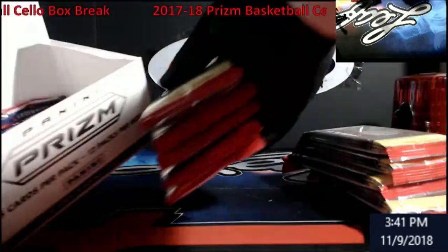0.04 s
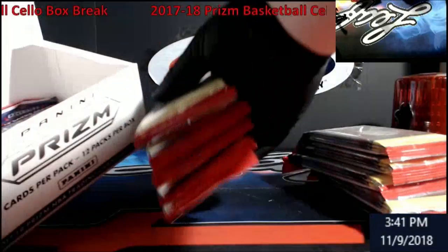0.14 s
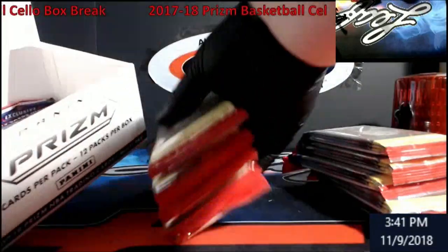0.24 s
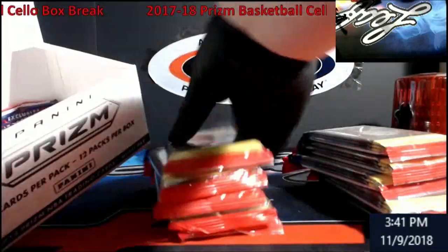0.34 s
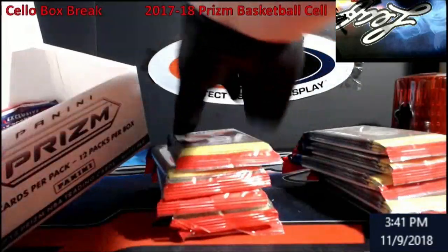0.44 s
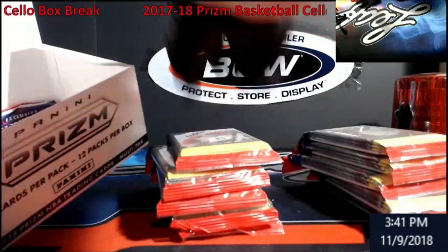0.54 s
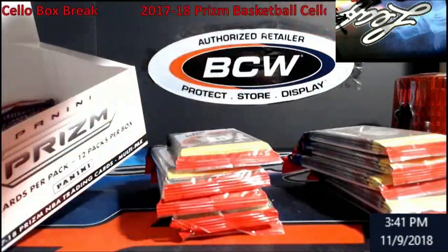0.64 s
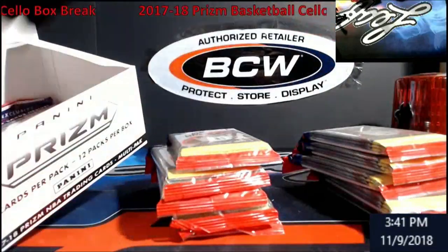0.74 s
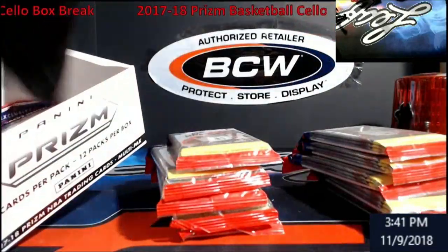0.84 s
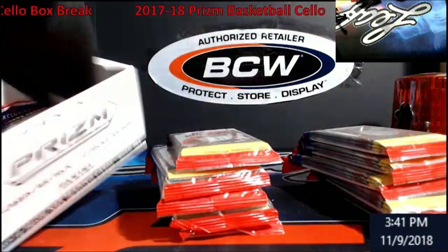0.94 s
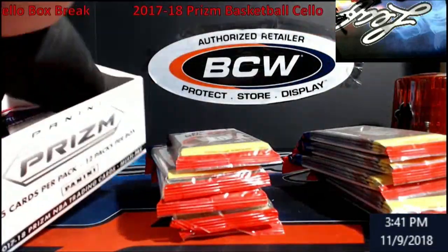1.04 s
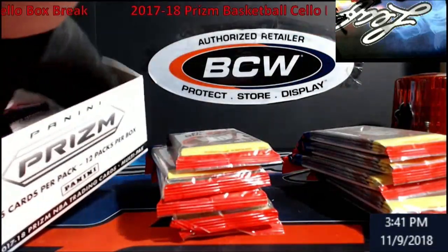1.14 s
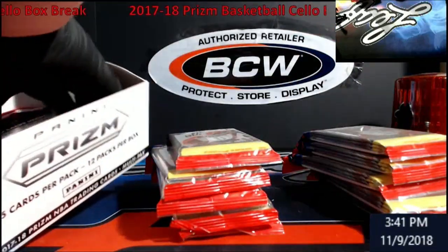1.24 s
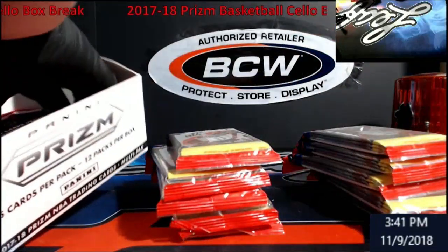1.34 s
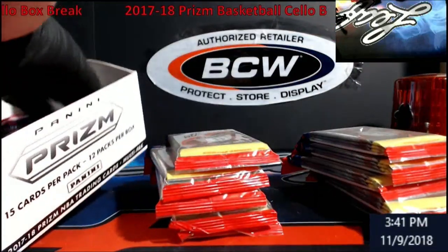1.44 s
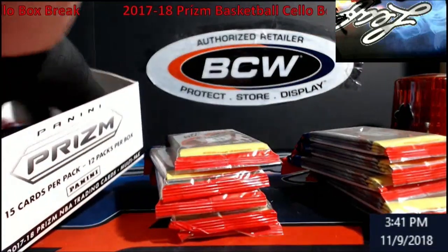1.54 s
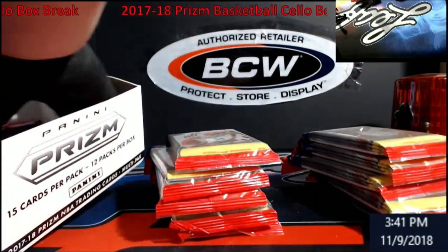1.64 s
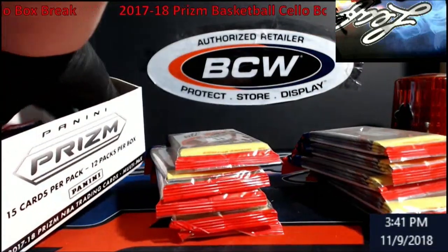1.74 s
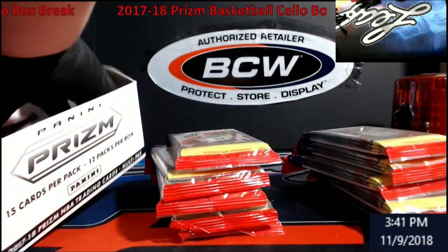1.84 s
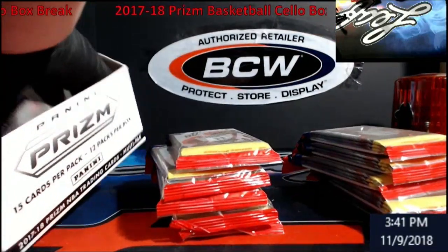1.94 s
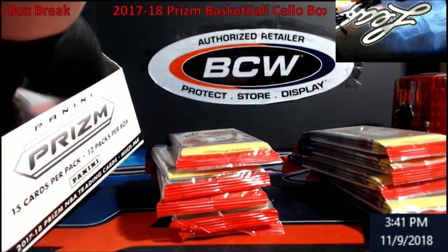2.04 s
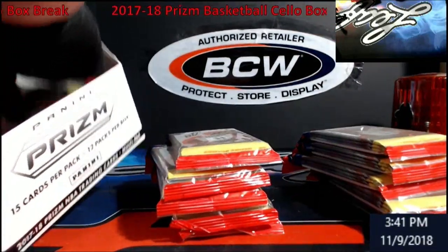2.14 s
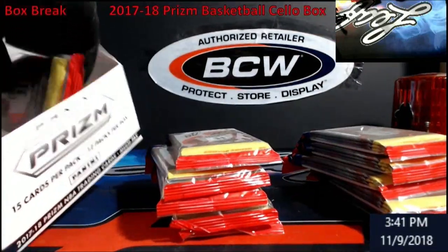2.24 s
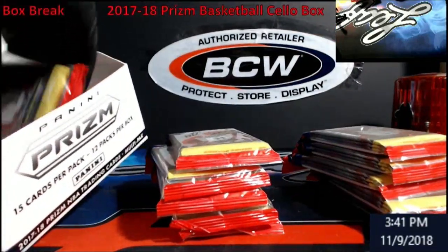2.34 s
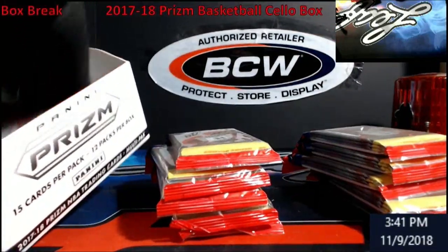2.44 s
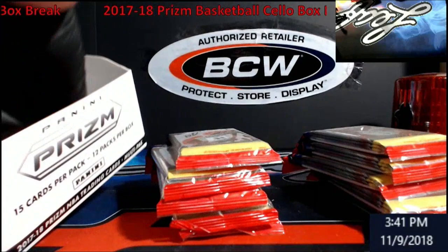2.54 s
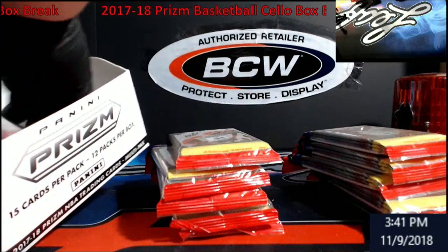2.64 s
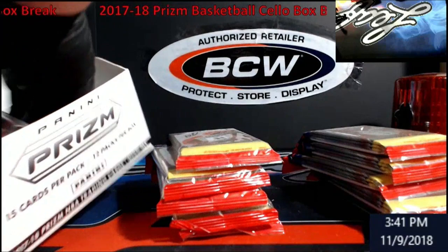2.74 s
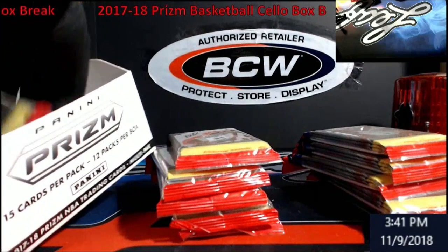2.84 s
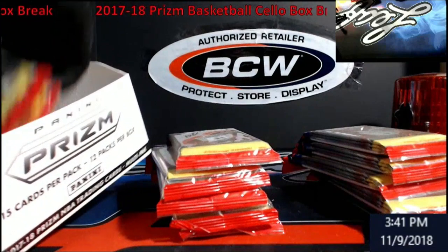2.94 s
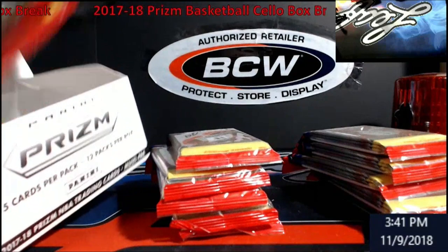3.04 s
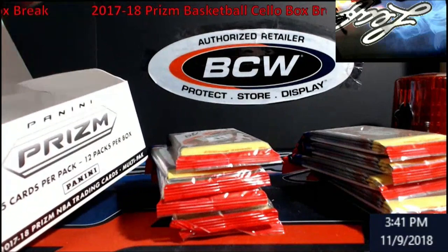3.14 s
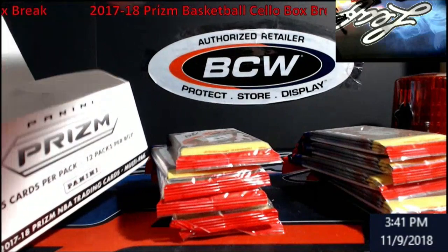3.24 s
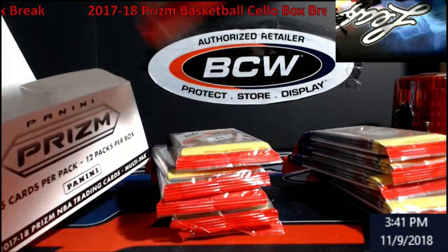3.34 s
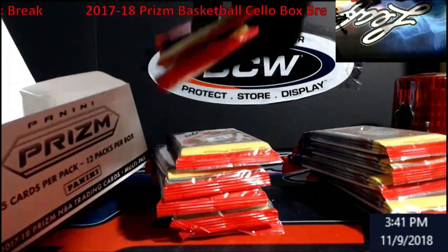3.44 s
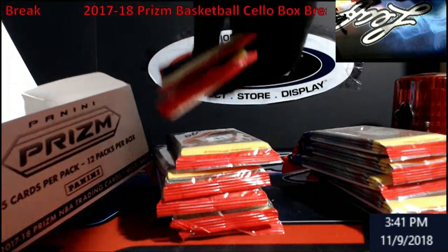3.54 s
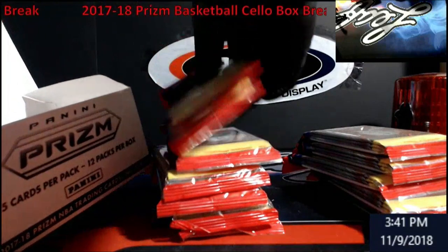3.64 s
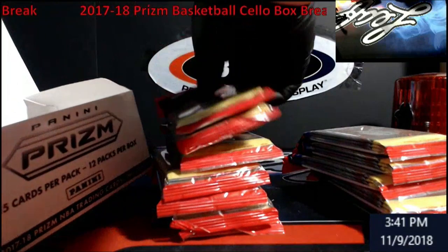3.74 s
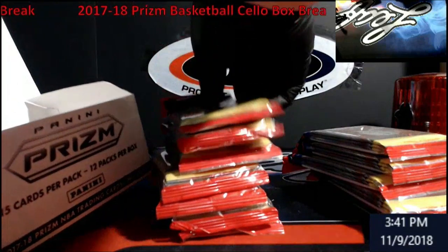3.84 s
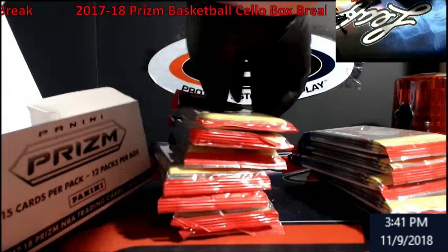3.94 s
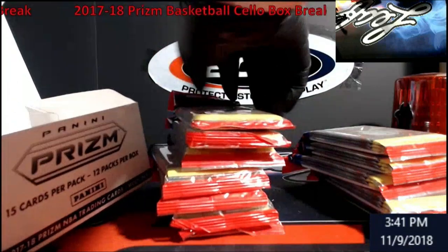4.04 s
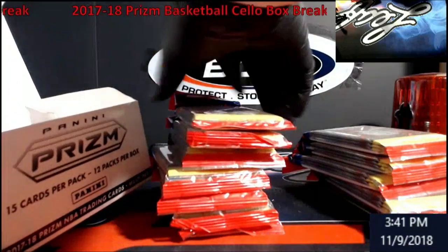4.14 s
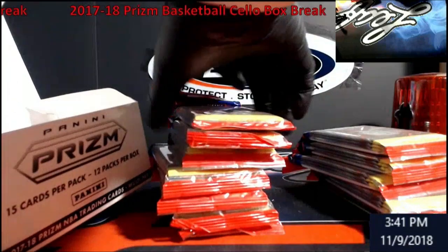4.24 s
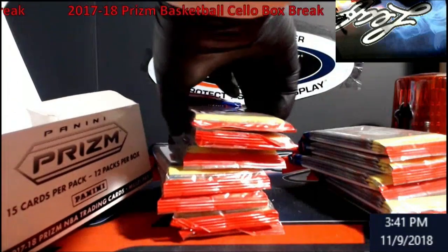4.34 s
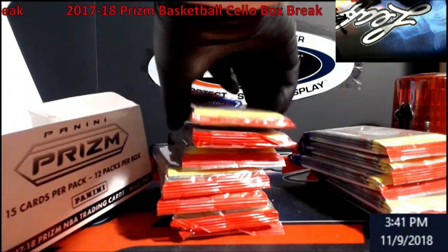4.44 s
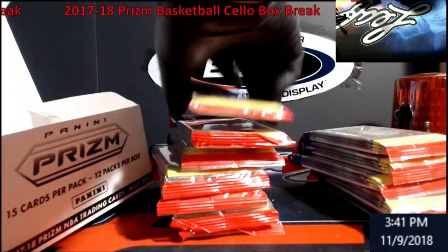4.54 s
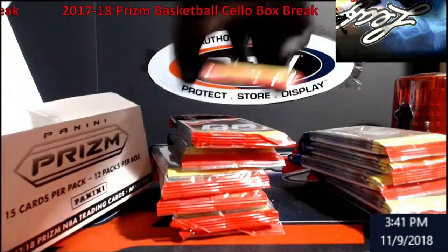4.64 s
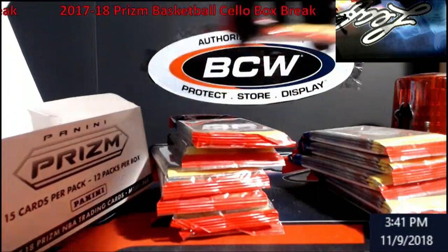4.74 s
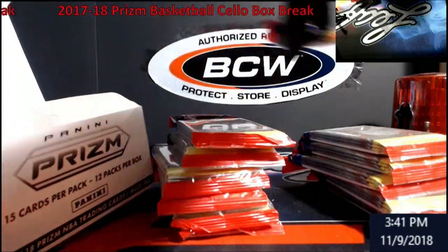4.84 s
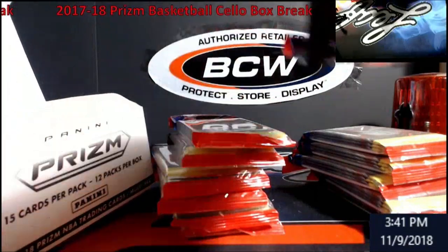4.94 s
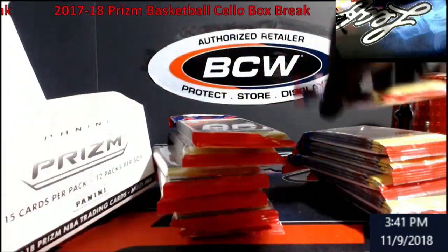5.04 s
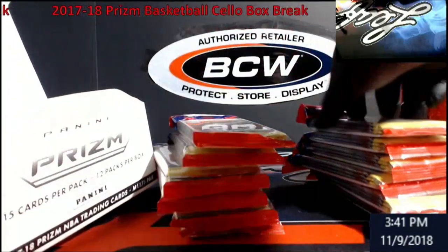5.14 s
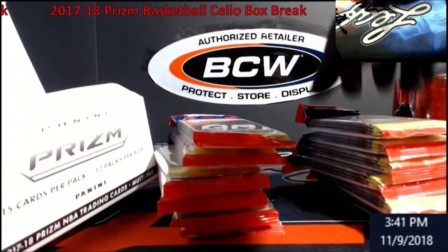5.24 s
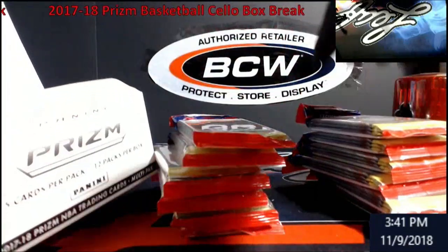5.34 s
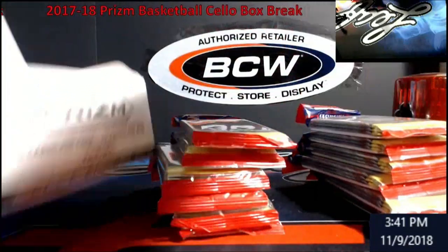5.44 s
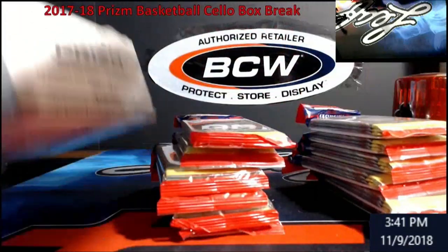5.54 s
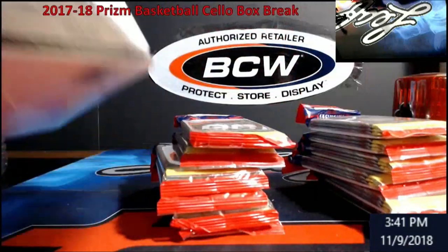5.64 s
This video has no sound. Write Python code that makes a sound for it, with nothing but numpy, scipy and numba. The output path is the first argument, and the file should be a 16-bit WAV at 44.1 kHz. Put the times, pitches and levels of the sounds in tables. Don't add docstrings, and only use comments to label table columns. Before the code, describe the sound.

Crinkly foil card packs crackle and snap as they are set down, dug noisily from a hollow cardboard box, then stacked softly.

```python
import sys
import numpy as np
from scipy import signal
from scipy.fft import rfft, irfft
from scipy.io import wavfile
from scipy.ndimage import uniform_filter1d, minimum_filter1d
from numba import njit

SR = 44100
rng = np.random.default_rng(int(sys.argv[2]) if len(sys.argv) > 2 else 0)


def inscribe(sig):
    pcm = np.round(np.clip(np.atleast_2d(sig).T, -1, 1) * 32767)
    wavfile.write(sys.argv[1], SR, pcm.astype(np.int16))


def volts_from_db(level):
    exponent = np.asarray(level, float) / 20
    return 10 ** exponent


N = 250605
T = np.arange(N) / SR

# frequency in Hz, density in dB per Hz.
FOIL = [(60, -35), (160, -19.5), (430, -10.5), (1020, -6), (1500, -7.5), (2300, -12.5), (2960, -15),
        (3600, -11), (4750, -16), (6130, -6.5), (7770, -12), (9600, -25), (13000, -45), (16000, -61.5)]
# frequency in Hz, width in Hz, level in dB.
BOX = [(207.6, 14, -10), (451, 37, -1), (583.7, 21, -3), (875, 160, 2), (986, 23, -12), (1390, 110, -9),
       (1950, 19, -17.5)]
SQUEEZE_DB_PER_S, LET_GO_DB_PER_S = 1801, 849.5


def level(x, db=0):
    return x * volts_from_db(db) / np.sqrt(np.mean(x ** 2))


def loudness(x, seconds):
    power = uniform_filter1d(x ** 2, int(seconds * SR))
    return np.sqrt(np.maximum(power, 0) + 1e-14)


def band(x, lo_hz, hi_hz, order=4):
    return signal.sosfilt(signal.butter(order, [lo_hz, hi_hz], "band", fs=SR, output="sos"), x)


def colour(x, points):
    hz, db = np.transpose(points)
    grid_hz = np.arange(2049) * SR / 4096
    log_gain = np.interp(np.log(grid_hz + 1), np.log(hz), db) * np.log(10) / 20
    cepstrum = irfft(log_gain)
    cepstrum[1:2048] *= 2
    cepstrum[2049:] = 0
    return signal.fftconvolve(x, irfft(np.exp(rfft(cepstrum))))[:N]


def resonate(x, modes):
    total = 0
    for k, (hz, width_hz, db) in enumerate(modes):
        mode = signal.lfilter(*signal.iirpeak(hz, hz / width_hz, SR), x)
        total = total + (-1) ** k * volts_from_db(db) * mode
    return total


def walk(rate):
    k = int(SR / rate)
    held = np.repeat(rng.standard_normal(N // k + 1), k)
    return 1.2 * uniform_filter1d(held, k)[:N]


def bursts(start, db, t60):
    out = np.zeros(N)
    for s, gain, t in zip(start, volts_from_db(db), t60):
        i = int(s * SR)
        n = min(int(max(t, .001) * SR), N - i)
        attack = np.minimum(np.arange(n) / 8, 1)
        out[i:i + n] += gain * volts_from_db(-60 * np.arange(n) / n) * attack
    return out


@njit
def rings(start, hz, t60, size):
    out = np.zeros(N)
    for k in range(len(start)):
        p = np.exp(2j * np.pi * hz[k] / SR - np.log(1000) / (t60[k] * SR))
        z = size[k] + 0j
        for i in range(start[k], min(N, start[k] + int(t60[k] * SR))):
            z *= p
            out[i] += z.imag
    return out


def effort(rows, offsets_db, rise_db_s, fall_db_s):
    db = np.full(N, -120.)
    for (s, held, start_db, swell_db, *_), offset_db in zip(rows, offsets_db):
        end = s + max(held, .002)
        shape = np.interp(T, [s, end], [0, swell_db])
        shape -= rise_db_s * np.maximum(s - T, 0)
        shape -= fall_db_s * np.maximum(T - end, 0)
        db = np.maximum(db, start_db + offset_db + shape)
    return volts_from_db(db)


def ticks(lo_hz, hi_hz, cycles, spread_db, patch_db, count):
    when, pitch, size, ring = rng.random((4, count))
    hz = lo_hz * (hi_hz / lo_hz) ** pitch
    patches = volts_from_db(patch_db * rng.standard_normal((10, 240)))
    patches /= np.sqrt(np.mean(patches ** 2, axis=0))
    favour = patches[(pitch * 10).astype(int), (when * 240).astype(int)]
    length = cycles * volts_from_db(17.0 * ring ** 2 + 1.0)
    gain = np.sqrt(hz / length) * favour * volts_from_db(-spread_db * np.log(1 - size))
    shower = rings((when * N).astype(np.int64), hz, length / hz, gain)
    return level(band(colour(shower, FOIL), lo_hz, hi_hz))


def handling():
    # start in seconds, held for seconds, level in dB, swell while held in
    # dB, stiff seams re thin foil in dB.
    squeezes = [(.836, 0.055, -39.5, -4, 2), (.897, 0.15, -33, -14.5, -3), (1.035, 0.11, -39, 8.5, -1.5),
                (1.143, 0.06, -40.5, -9.5, 1.5), (1.277, 0.039, -34.5, -14, 1),
                (1.391, 0.0524, -36.5, -15.5, -11), (1.5, .052, -68, 14, -6),
                (1.562, 0.0036, -36, -6.5, -20.5), (1.618, 0.042, -35, 7.5, -6.5),
                (1.694, 0.048, -40, 12, 0.5), (1.77, 0.053, -34.5, -10.5, 7), (1.836, 0.18, -24, -4, -2.5),
                (2.02, 0.18, -31, -0.5, -1.5), (2.185, 0.068, -29.5, -38, 0), (2.24, 0.047, -54.5, 7, -23),
                (2.299, 0.055, -24.5, -17, -8.5), (2.37, 0.1, -34, -16.5, -6),
                (2.525, 0.097, -37.5, 22.5, -4), (2.616, 0.13, -21, -17, 1), (2.75, 0.092, -36, 13, -4.5),
                (2.85, 0.043, -23, -7, -10),
                (0, 0.08, -63.5, 7, -3), (0.084, 0.13, -43, -17.5, -19), (0.198, 0.074, -44, 19, 0),
                (0.262, 0.056, -27.5, -18.5, 6), (0.449, 0.4, -80.5, -1.5, -5),
                (3.502, 0.018, -51, -9, -13), (3.567, 0.035, -46, 0.5, -4), (3.608, 0.025, -37.5, -1, -5),
                (3.645, 0.056, -46.5, -14, -28), (3.701, 0.094, -56, 15.5, -5),
                (3.78, 0.066, -37.5, -23, -16), (3.89, 0.18, -54.5, -2, -8),
                (4.207, 0.12, -55.5, -1.5, -12), (4.412, 0.018, -60.5, -1.5, -16.5),
                (5.2, 0.053, -72.5, 4, -10.5), (2.93, 0.086, -39, -9, -3), (4.425, 0.11, -72, 16.5, -18),
                (4.527, 0.023, -43.5, -13, -32), (4.7, 0.071, -73, 9.5, -6),
                (5.008, 0.055, -44.5, 12.5, -11), (5.043, 0.11, -28.5, -42, -2),
                (5.281, 0.028, -57.5, 22.5, -3.5), (5.31, 0.11, -38, -22, -10),
                (5.433, 0.026, -50.5, 4, -5.5), (5.47, 0.074, -68.5, 12, -12), (5.596, 0.1, -73, 8.5, -3)]
    # start in seconds, held for seconds,
    # level in dB, swell while held in dB, desk rumble re scrape in dB.
    drags = [(0.849, 0.22, -30, -14.5, -11.5), (1.052, 0.092, -33, 7.5, -8), (1.28, 0.0095, -28, 8, -22.5),
             (1.395, 0.029, -41.5, -1.5, -13), (1.557, 0.12, -37, -3, -6), (1.7, 0.072, -36, 8, -31),
             (1.767, 0.021, -19, -6.5, 4.5), (1.8, 0.18, -26.5, -5, -7), (1.894, 0.076, -22, -16, -4),
             (2.009, 0.056, -39, 9.5, -27), (2.116, 0.071, -26.5, 0, -26.5), (2.22, 0.06, -48, -15, -25),
             (2.293, 0.028, -37.5, 5.5, -36), (2.368, 0.035, -32.5, -9, -19), (2.435, 0.026, -34.5, 0, -16),
             (2.5, .07, -57.5, 12.5, -8), (2.589, 0.12, -24, -12, -22.5), (2.779, 0.12, -42, 6.5, -31),
             (0, 0.038, -36, -34, -13), (.11, 0.05, -67.5, 10.5, 11), (.263, 0.013, -21, -3, -2),
              (3.572, 0.079, -74, 19, -4), (3.714, 0.18, -52, -21, -17), (4.27, 0.15, -60.5, -16.5, -1.5),
              (4.42, 0.38, -81, 2.5, 0), (5.047, 0.092, -27.5, -28, 2), (5.31, 0.057, -37.5, -13.5, 2.5),
              (5.457, 0.045, -50.5, -15, -7), (5.604, 0.019, -39, -9, -9.5)]
    push_db_per_s, settle_db_per_s = 1101, 503
    grips, slides = squeezes, drags

    fine = ticks(6300., 15500.0, cycles=63.0, spread_db=2.0, patch_db=3.0, count=18000)
    broad = ticks(4700., 6400., cycles=64.0, spread_db=1.0, patch_db=1.0, count=8000)
    stiff = ticks(1500.0, 5500.0, cycles=35., spread_db=2.0, patch_db=3.5, count=14000)
    scrape = ticks(350., 1700., cycles=9.8, spread_db=2.5, patch_db=3.0, count=7000)
    scrape = level(scrape + 1.54 * resonate(scrape, BOX))
    rumble = ticks(135., 360., cycles=5.2, spread_db=2.5, patch_db=1.0, count=1200)

    stiff_db, rumble_db = np.transpose(grips)[-1], np.transpose(slides)[-1]
    broad_db = 0.1 + 0.65 * stiff_db
    fine_db = -10 * np.log10(1 + volts_from_db(broad_db) ** 2)

    def grip(db):
        return effort(grips, db, SQUEEZE_DB_PER_S, LET_GO_DB_PER_S)

    def slide(db):
        return effort(slides, db, push_db_per_s, settle_db_per_s)

    foil = grip(fine_db) * top_band(fine) + grip(fine_db + broad_db) * broad
    foil = foil + grip(stiff_db) * stiff + grip(0.68 * stiff_db + 3.5) * crackle()
    foil = foil + sliding(fine)
    bunching_db = 1.6 * walk(110) + .8 * walk(22)
    rubbing = slide(0 * rumble_db) * scrape + slide(rumble_db) * rumble
    return volts_from_db(bunching_db - 5.0) * foil + volts_from_db(-6.5) * rubbing


def top_band(fine):
    # start in seconds, held for seconds, level in dB, swell while held in dB.
    top_openings = [(.24, .025, 2, -6), (.89, .03, -6, 0), (1.12, .03, 3, 0), (1.64, .045, 3.5, 0),
                    (1.715, .045, 4, 0), (1.91, .08, -3, 0), (2.12, .06, -3, 0), (2.575, .04, 8, 0),
                    (2.82, 0.079, 4, 3), (5.005, .05, 3, -4)]
    closed_db = -24
    top = signal.sosfiltfilt(signal.butter(8, 13400, "high", fs=SR, output="sos"), fine)
    opening = effort(top_openings, np.zeros(len(top_openings)), SQUEEZE_DB_PER_S, LET_GO_DB_PER_S)
    return fine + (opening + volts_from_db(closed_db) - 1) * top


def crackle():
    jolts_per_s = 280
    struck = rng.random(N) < jolts_per_s / SR
    jolts = struck * rng.standard_normal(N) * volts_from_db(0.83 * rng.exponential(size=N))
    return level(band(colour(jolts, FOIL), 1000, 10500, order=2), -9)


def sliding(fine):
    # start in seconds, held for seconds, level in dB,
    # swell while held in dB, upper whistle re lower in dB.
    face_slides = [
        (3.89, 0.02, -51, 1.5, -12),
        (3.93, 0.19, -52, -0.5, -14.5),
        (4.205, 0.11, -54, -3, -1.5),
        (5.5, .045, -69.5, 8, -14),
    ]
    low = level(resonate(fine, [(7350, 970, 0)]))
    high = level(resonate(fine, [(8920, 390, 0)]))
    upper_db = np.transpose(face_slides)[-1]
    low_gain = effort(face_slides, 0 * upper_db, SQUEEZE_DB_PER_S, LET_GO_DB_PER_S)
    high_gain = effort(face_slides, upper_db, SQUEEZE_DB_PER_S, LET_GO_DB_PER_S)
    return low_gain * low - high_gain * high


def snaps():
    # start in seconds, peak in dB, stiff part re peak in dB.
    lone = [(0.079, -7.5, -9), (0.2056, -10, -9), (0.2385, -13, -11), (0.2392, -12, -10), (.2434, -18, -20),
            (0.2485, -27, 8), (0.2525, -11, -6), (0.255, 3, -4), (.257, -7, -3), (.8383, -24, -13),
            (2.9699, -29, -12.5), (4.011, -46, -30), (4.058, -45, -30), (1.9475, -26.5, -14),
            (0.982, -26, -24), (1.124, -20, -6), (1.127, -10.5, -16), (1.1295, -26.5, 4), (0.927, -37, -13),
            (1.0726, -23, -8), (1.7816, -19, -1), (2.5745, -18, -9), (0.1948, -27, -10), (0.174, -46.5, 13),
            (1.383, -17.5, 4.5), (1.4128, -23, -18), (1.4248, -45, 12.5), (1.6206, -34, -18),
            (1.6586, -15, -21), (1.7324, -15, -14), (1.7416, -11, -17), (1.7621, -5, -3),
            (1.823, -11.5, -16), (2.144, -14.5, -20), (2.6737, -9.5, -8.5), (2.615, -7.5, -9.5),
            (1.433, -30, -20), (1.511, -51, -20), (2.7332, -27, -21), (2.893, -19.5, -5),
            (3.4951, -40.5, -21.5), (3.673, -34, -40), (3.7051, -21, 4.5), (3.772, -11.5, -24),
            (1.977, -8, -28), (3.968, -43, -35), (4.045, -38, -35), (4.07, -45, -35), (4.19, -48.5, -20),
            (4.465, -54, -20.5), (4.4867, -34.5, -37.5), (5.655, -50, -6), (5.674, -47, -11),
            (5.0077, -22.5, 6), (5.009, -8.5, -6.5), (5.0425, -23.5, 10), (5.0362, -24, 2),
            (5.3462, -21, -12.5)]
    crunches = [(0.1907, -30, -6), (0.2264, -41, -4.5), (0.277, -30.5, 6.5), (0.832, -32, -1.5),
                (.852, -23.5, -21), (0.856, -21.5, -14), (0.8928, -19.5, -19), (0.8977, -21.5, -14),
                (.908, -28.5, -3), (1.0408, -20, -35), (1.094, -24, 1.5), (1.141, -33, -9),
                (1.269, -31.5, -25), (1.289, -28, -0.5), (1.557, -33, -3), (2.056, -18, -1),
                (2.1831, -21, -8), (2.003, -22.5, -8.5), (2.534, -28.5, -13), (2.3622, -17, -19),
                (2.465, -30, -41), (2.516, -43.5, -9.5), (2.5722, -34.5, -21.5), (2.5427, -23.5, -9.5),
                (2.5917, -14, -5.5), (2.6018, -10, -31), (2.614, -24, -21.5), (2.626, -15, -3),
                (3.561, -35.5, -4), (3.637, -30.5, -5.5), (5.589, -56, -6), (3.8514, -36, -29),
                (4.393, -56, -10.5), (4.5483, -55, 1.5), (4.761, -55, -24), (5.036, -34, -8),
                (5.307, -29.5, -6.5)]
    snap_t60_s, crunch_t60_s = 0.01, 0.037
    s, db, stiff_db = np.transpose(lone + crunches)
    t60 = np.repeat([snap_t60_s, crunch_t60_s], [len(lone), len(crunches)])
    noise = rng.standard_normal(N)

    def voice(x, lo_hz, hi_hz):
        return band(colour(x, FOIL), lo_hz, hi_hz)

    def part(db, lo_hz, hi_hz):
        push = noise * (bursts(s, db, t60) + bursts(s, db - 29.0, t60 + 0.058))
        push[(s * SR).astype(int) + 4] += 2.0 * volts_from_db(db) * (t60 == snap_t60_s)
        return voice(push, lo_hz, hi_hz) / np.std(voice(noise, lo_hz, hi_hz))

    return volts_from_db(-7.5) * part(db, 4900, 11000) + volts_from_db(-6.5) * part(db + stiff_db, 2000, 4600)


def knocks():
    # start in seconds, peak in dB, main pitch in Hz, thud re peak in dB.
    blows = [(0.006, -34, 770, -28), (0.135, -32, 432, -11), (0.193, -40.5, 1240, -33),
             (0.2056, -22, 744, -34), (0.2052, -19.5, 1156, -34), (0.2565, -10.5, 880, -30),
             (0.2556, -14, 1244, -40), (0.276, -31, 913, -18), (0.834, -20, 280, -23.5),
             (1.051, -23.5, 419, -14), (1.265, -26, 664, -45), (1.27, -17, 720, -40),
             (1.288, -18, 632, -16.5), (1.3833, -28, 1020, -29), (1.3834, -24.5, 2004, -38),
             (1.557, -13, 674, -23), (1.763, -7.5, 423, -11.5), (1.7616, -11, 1050, -31),
             (1.936, -17.5, 1800, -25), (1.767, -15, 1480, -30), (1.8225, -22.5, 1770, -30),
             (2.134, -44, 560, -51), (2.296, -35, 1210, -38), (2.363, -30, 767, -34),
             (2.435, -31, 680, -23), (2.577, -21.5, 516, -7.5), (2.792, -22, 1092, -38),
             (2.872, -26, 1235, -23.5), (3.563, -46, 716, -27.5), (3.611, -43.5, 732.4, -39),
             (4.539, -47, 1251, -8), (5.008, -23, 1015, -11.5), (5.037, -38, 1045, -15),
             (5.045, -17.5, 489, -20), (5.0435, -21, 765, -26), (5.0425, -23.5, 1820, -40),
             (5.307, -30.5, 433, -27), (5.35, -40, 330, -20), (5.448, -42.5, 742, -18.5),
             (5.59, -46, 875, -7.5), (5.59, -42, 332, -12)]
    # frequency in Hz, width in Hz, level in dB.
    desk_modes = [(138, 12, -3), (176, 58, 2), (268, 100, -2)]
    hollow_db = 3
    s, db, hz, thud_db = np.transpose(blows)
    t60 = 0.076 * (hz / 700) ** -0.44
    panel = rings((s * SR).astype(np.int64), hz, 0.6 * t60, volts_from_db(db - 4.5))
    shake = rng.standard_normal((2, N))
    box = resonate(shake[0] * bursts(s, db + hollow_db, t60), BOX)
    desk = resonate(shake[1] * bursts(s, db + thud_db, 1.0 * t60), desk_modes)
    hollow = band(panel, 130, 3700, order=2) + band(box, 150, 4500, order=2)
    return hollow + volts_from_db(15.0) * band(desk, 96, 700, order=2)


def pats():
    # centre in seconds, frequency in Hz, peak in dB, duration in seconds.
    landings = [(.0052, 827, -22, 0.001), (1.765, 420, -4.5, 0.00054), (1.93, 230, -22.5, 0.0043),
                (5.0482, 300.2, -18.5, .001), (5.058, 450, -24.5, 0.0023), (2.367, 2210, -30, .003),
                (2.366, 880, -31, 0.001805), (3.7056, 2880, -20, 0.00052), (3.774, 1530, -36, 0.0018),
                (5.008, 1190, -28, 0.0017), (5.011, 1660, -27, 0.002), (5.0417, 250, -6, 0.00044),
                (.079, 5600, -9, 0.00033), (1.5585, 700, -13.5, 0.0009), (1.768, 450, -10, 0.00072)]
    total = np.zeros(N)
    for s, hz, db, lasts in landings:
        swell = np.exp(-((T - s) / lasts) ** 2)
        total += volts_from_db(db) * swell * np.cos(2 * np.pi * hz * (T - s))
    return total


def thumps():
    # start in seconds, frequency in Hz, level in dB, T60 in seconds.
    stack_lands = [(0.137, 110, -29, 0.067), (0.259, 112.5, -15, 0.056), (1.135, 84, -35.5, 0.071),
                   (2.589, 96, -45, 0.16), (5.331, 85, -54.5, 0.11), (5.57, 90.5, -45, 0.093),
                   (3.569, 147, -45, 0.035), (3.895, 169, -46.5, 0.063), (4.245, 177.6, -47.5, 0.053),
                   (4.355, 154, -51, 0.084), (5.042, 124, -50, 0.099), (5.599, 201, -49, 0.077)]
    s, hz, db, t60 = np.transpose(stack_lands)
    return band(rings((s * SR).astype(np.int64), hz, t60, volts_from_db(db)), 85, 560)


def squeak():
    # centre in seconds, frequency in Hz, level in dB.
    whistles = [(0.059, 730, -53.5), (0.09, 1620, -45), (0.141, 1950, -53), (0.133, 747, -47.5),
                (.955, 1600, -43.5), (1.92, 1970, -42), (2.162, 3570, -32.5), (2.245, 1240, -57),
                (2.27, 1150, -53), (2.315, 810, -37), (2.315, 1996, -37.5), (2.315, 2570, -35.5),
                (2.318, 3440, -41.5), (2.34, 1202, -46), (2.401, 2490, -44.5), (2.465, 1147, -40.5),
                (2.485, 668, -52), (2.51, 1160, -59), (2.535, 1186, -48.5), (2.615, 1590, -34),
                (2.88, 1250, -41.5), (2.895, 635, -41), (5.109, 523.7, -48), (5.134, 434, -54),
                (4.211, 1550, -61.5), (4.265, 1540, -48.5), (4.301, 1570, -58.5), (4.428, 1540, -61.5),
                (4.534, 3560, -70), (5.43, 3400, -59), (5.451, 3290, -58.5), (5.455, 2900, -64),
                (5.441, 804, -59), (5.365, 4050, -53), (5.461, 785, -50)]
    noise = rng.standard_normal(N)
    total = np.zeros(N)
    for s, hz, db in whistles:
        whistle = level(band(noise, .965 * hz, 1.035 * hz, order=2))
        total += volts_from_db(db) * np.exp(-((T - s) / 0.011) ** 2) * whistle
    return total


def room():
    # frequency in Hz, density in dB per Hz.
    air_spectrum = [(24, -65), (40, -25.5), (81, -20), (97, -13.5), (155, -9), (178, -9), (220, -8.5),
                    (403, -16.5), (659, -17), (1760, -24.5), (2800, -29.5), (7470, -32), (10600, -43),
                    (13000, -46), (15700, -46), (22000, -120)]
    air_db, fan_hz, fan_db = -67.5, 152, -71
    air = colour(rng.standard_normal(N), air_spectrum) * volts_from_db(1.5 * walk(13))
    hum = np.sin(2 * np.pi * np.cumsum(fan_hz * (1 + 0.0018 * walk(9.6))) / SR)
    return level(air, air_db) + volts_from_db(fan_db + 2.0 * walk(7)) * hum


def scene():
    tail_t60_s, tail_db = 0.2, -10.5
    dip_s, dip_db_per_s, dip_for_s = 2.9, 748, .4
    near = handling() + snaps() + knocks() + pats() + thumps() + squeak()
    near = signal.sosfilt(signal.butter(4, 88, "high", fs=SR, output="sos"), near)
    t = T[:SR // 2]
    tail = rng.standard_normal(len(t)) * volts_from_db(-60 * t / tail_t60_s) * (t > .004)
    tail *= volts_from_db(tail_db) / np.sqrt(np.sum(tail ** 2))
    echo = signal.fftconvolve(near, tail)[:N]
    direct, late = loudness(near, .03), loudness(echo, 0.034)
    heard = near + echo * direct ** 2 / (direct ** 2 + (0.22 * late) ** 2)
    dip_db = -np.clip(dip_db_per_s * (T - dip_s), 0, 22) * (T < dip_s + dip_for_s)
    return (heard * volts_from_db(dip_db) + room())[None]


def coarsen(x, sharpen):
    frames = signal.stft(x, nperseg=1024, window="cosine")[2]
    size = abs(frames) + 1e-9
    near = np.sqrt(uniform_filter1d(size ** 2, 15, axis=0))
    steady = np.minimum(minimum_filter1d(near, 3, axis=1) / near * 1.8, 1) ** 2
    gain = np.minimum(size / near, 1.5) ** (sharpen * steady * rng.random(size.shape[1]))
    thin = signal.istft(frames * gain, nperseg=1024, window="cosine")[1][:N]
    return thin * loudness(x, .004) / loudness(thin, .004)


def starve(x):
    # frame centre in seconds, lower limit in Hz, share of bands kept from 0 to 1.
    starved = [(0.0926, 300, 0.17), (0.14, 1000, 0.23), (0.648, 1800, 0), (0.959, 2600, 0.35),
               (1.104, 2000, 0.6), (1.205, 800, 0.9), (1.361, 1500, 0.5), (1.465, 1000, 0.26),
               (1.587, 900, 0.03), (1.651, 1000, 0.39), (1.924, 1500, 0.59), (2.005, 1000, 0.75),
               (2.13, 2500, 0.93), (2.251, 1500, 0.66), (2.642, 1500, 0.9), (.396, 800, 0.6),
               (2.318, 100, 0.6), (4.166, 3000, 0.3), (4.285, 1800, 0.7), (4.367, 3500, 0.45),
               (4.534, 1500, 0.87), (4.614, 1500, 0.02), (4.786, 1500, 0.1), (4.982, 1200, 0.32),
               (5.152, 1500, 0.14), (3.03, 1500, 0.3), (5.478, 2500, .6)]
    out, window = x.copy(), signal.windows.tukey(1280, .8)
    hz = np.arange(640) * SR / 1280
    for s, above_hz, kept in starved:
        frame = slice(int(s * SR) - 640, int(s * SR) + 640)
        bins = rfft(x[frame] * window)
        power = (abs(bins[:-1]) ** 2).reshape(64, 10).sum(axis=1)
        power = np.repeat(power * volts_from_db(7 * rng.standard_normal(64)), 10)
        heard = (hz > above_hz) & (hz < 10000)
        weak = (hz > above_hz) & (power < np.quantile(power[heard], 1 - np.clip(kept, 0, 1)))
        out[frame] -= .96 * irfft(bins * np.append(weak, 0))
    return out


def top_cut(x):
    return signal.sosfilt(signal.butter(12, 15800, fs=SR, output="sos"), x)


def record(dry):
    x = starve(coarsen(dry[0], sharpen=0.71))
    return top_cut(np.clip(x, -1, 1)[None])


dry = scene()
out = record(dry)
inscribe(out)
```